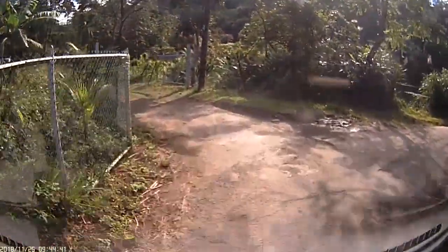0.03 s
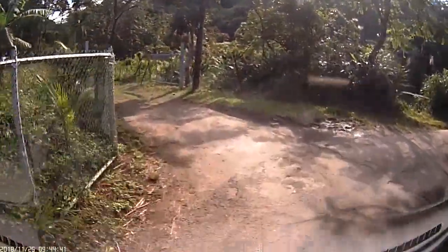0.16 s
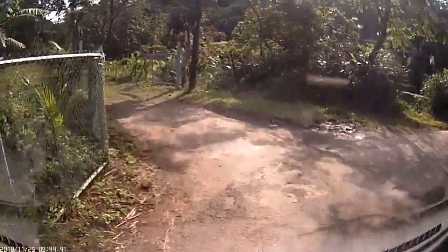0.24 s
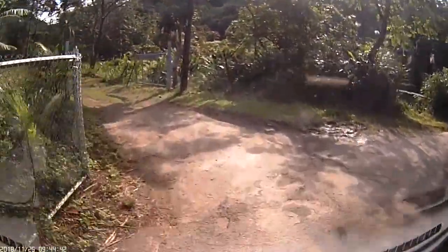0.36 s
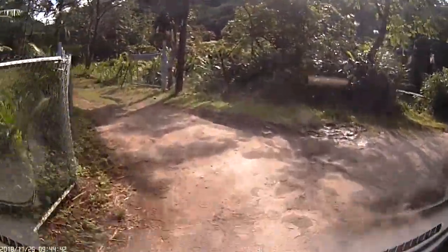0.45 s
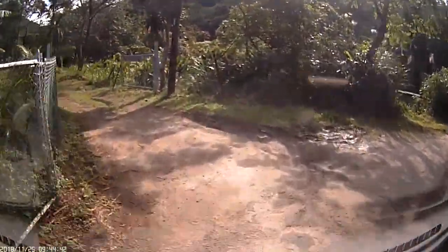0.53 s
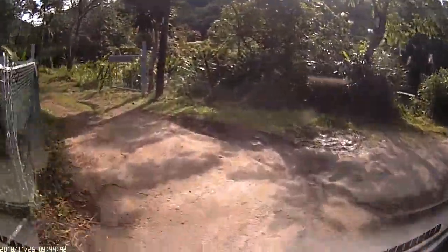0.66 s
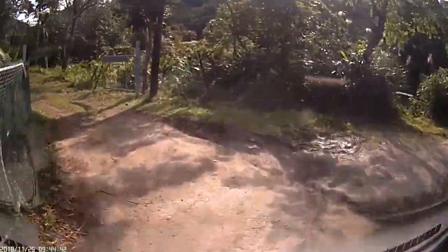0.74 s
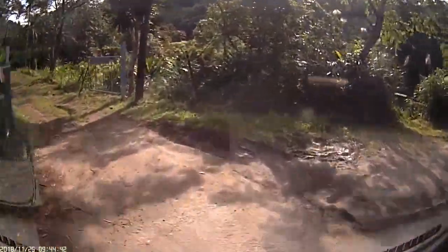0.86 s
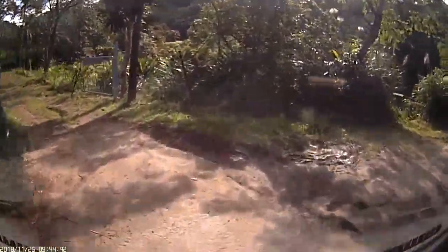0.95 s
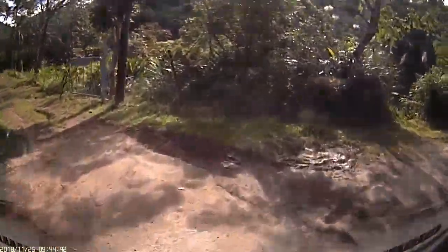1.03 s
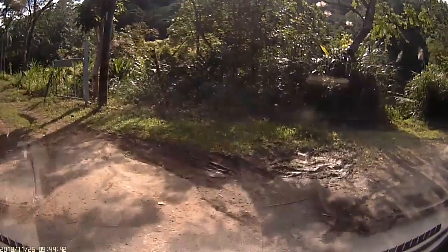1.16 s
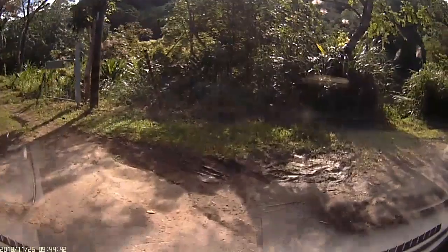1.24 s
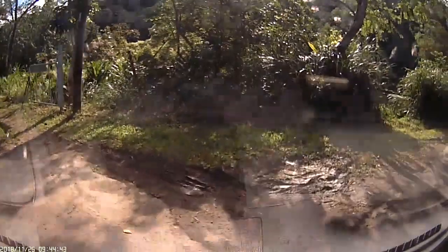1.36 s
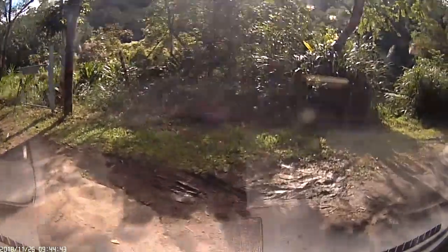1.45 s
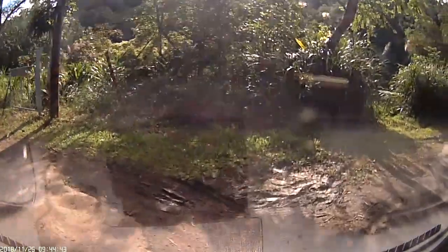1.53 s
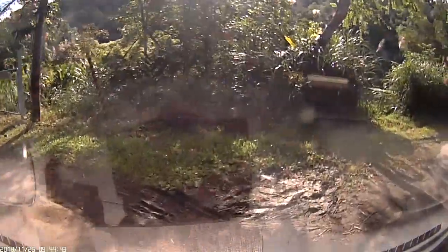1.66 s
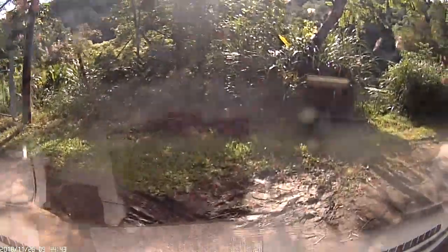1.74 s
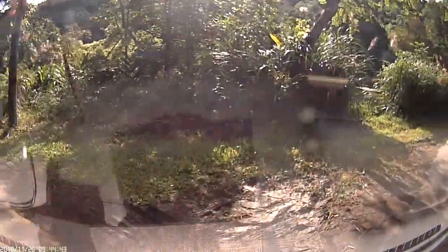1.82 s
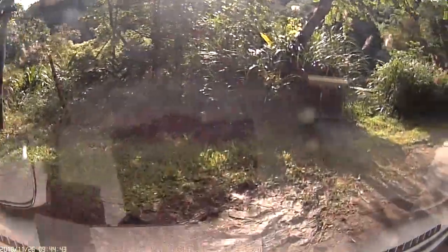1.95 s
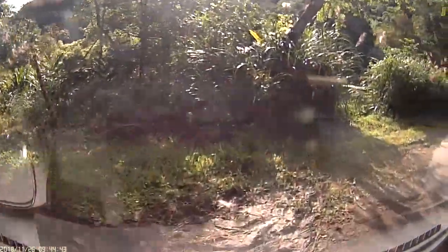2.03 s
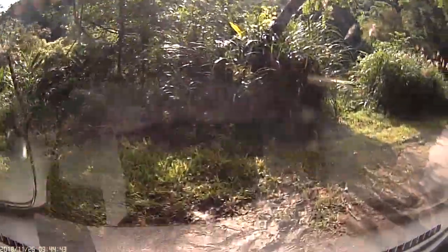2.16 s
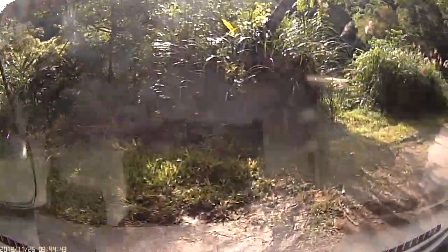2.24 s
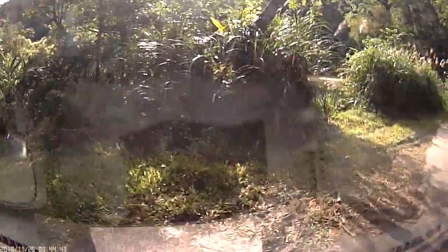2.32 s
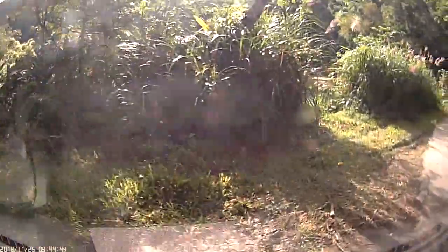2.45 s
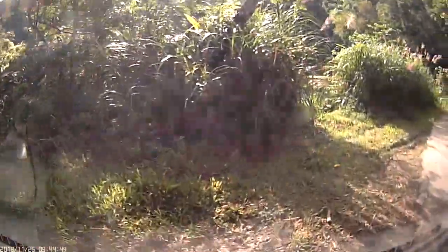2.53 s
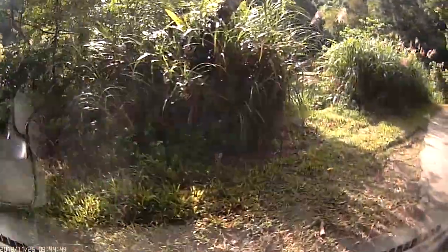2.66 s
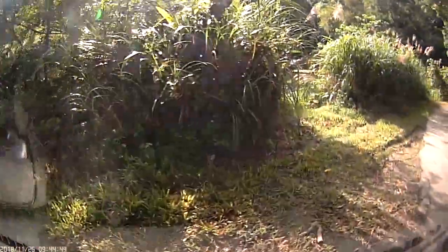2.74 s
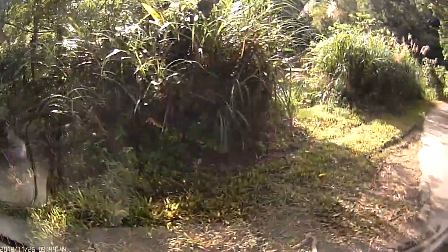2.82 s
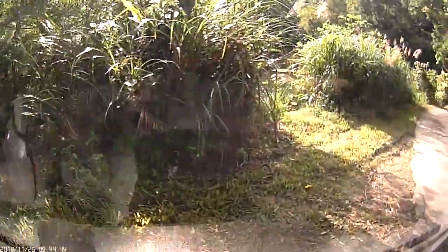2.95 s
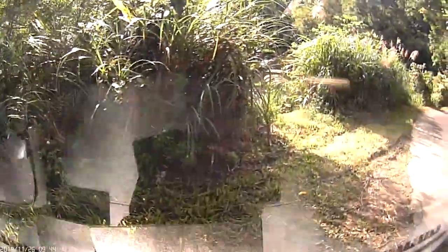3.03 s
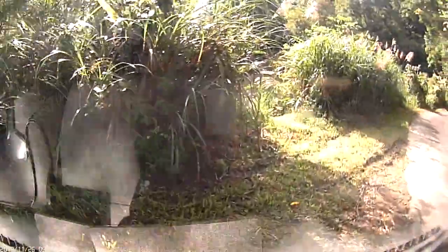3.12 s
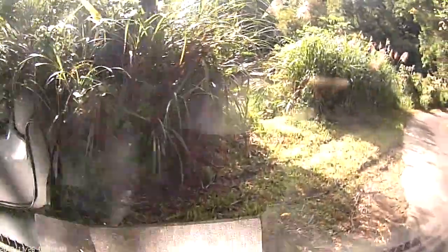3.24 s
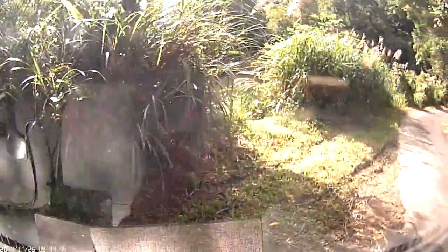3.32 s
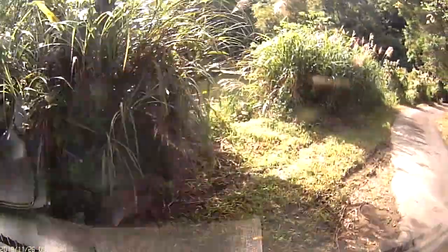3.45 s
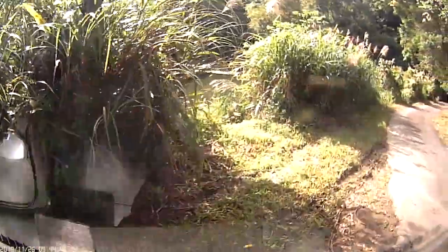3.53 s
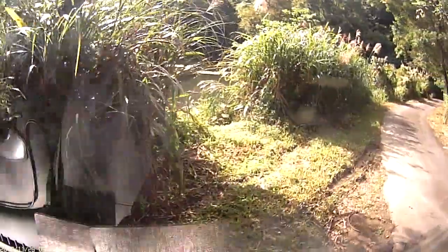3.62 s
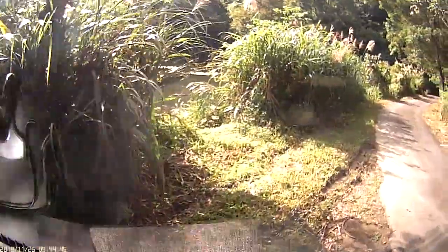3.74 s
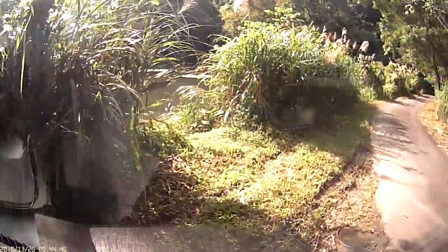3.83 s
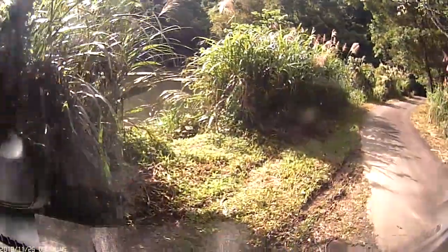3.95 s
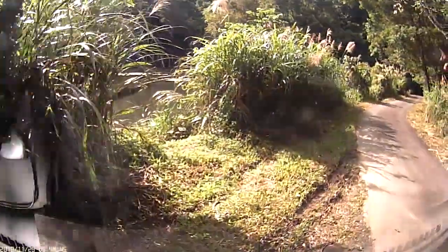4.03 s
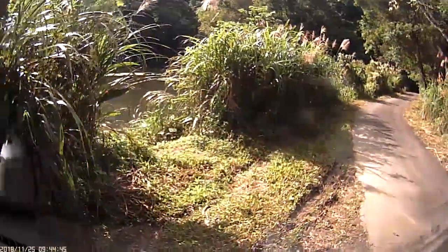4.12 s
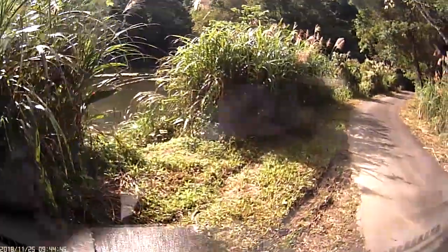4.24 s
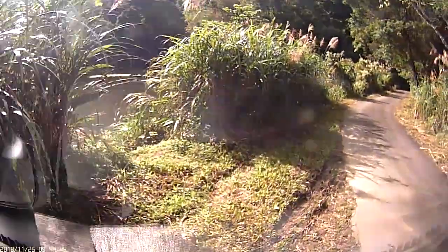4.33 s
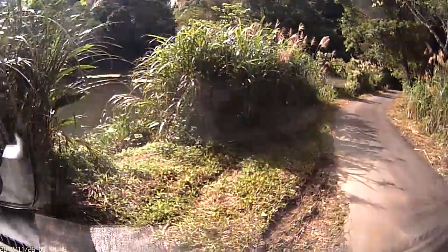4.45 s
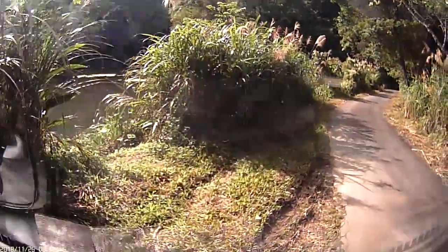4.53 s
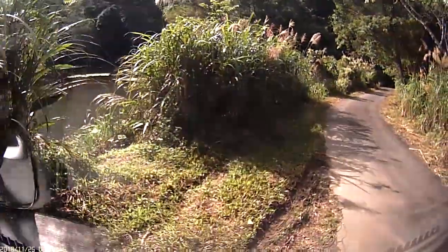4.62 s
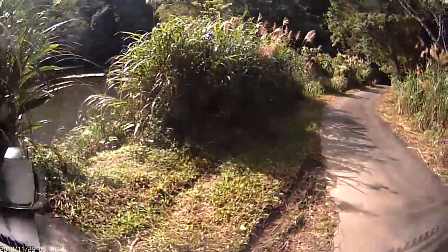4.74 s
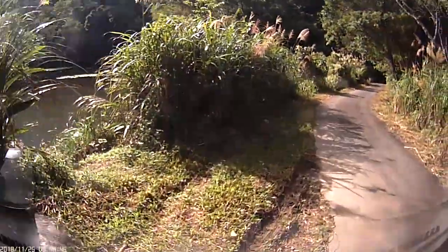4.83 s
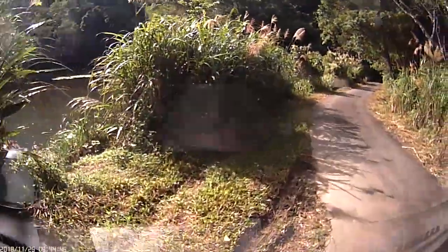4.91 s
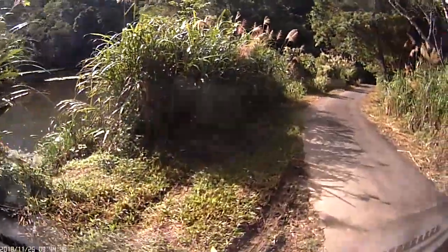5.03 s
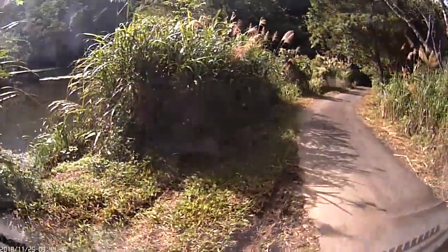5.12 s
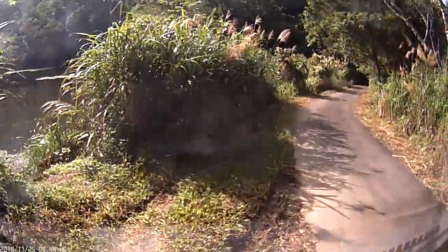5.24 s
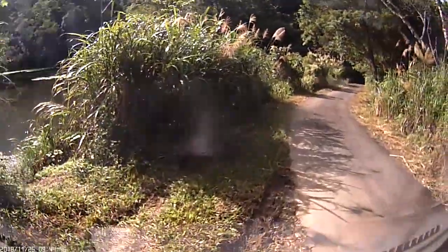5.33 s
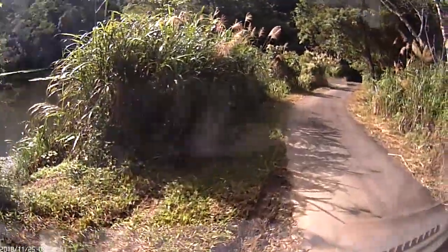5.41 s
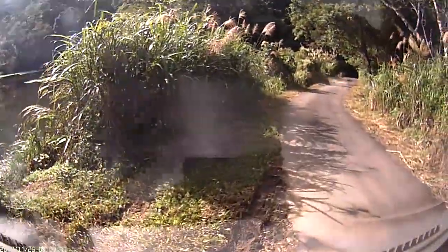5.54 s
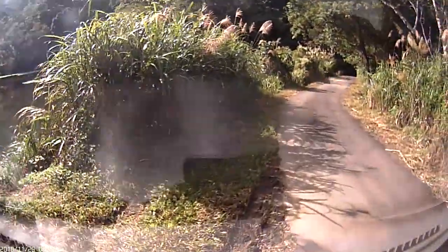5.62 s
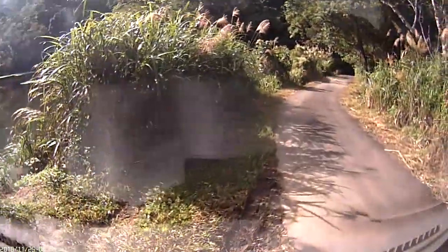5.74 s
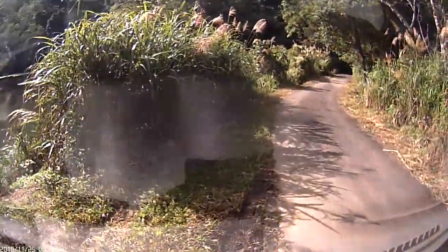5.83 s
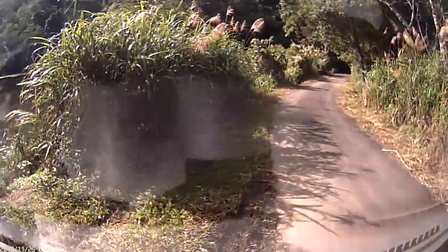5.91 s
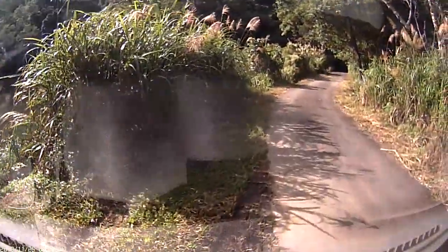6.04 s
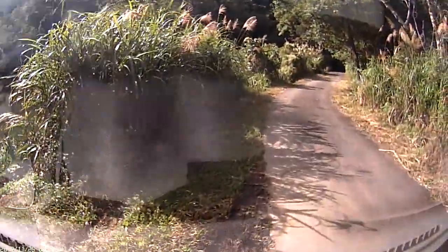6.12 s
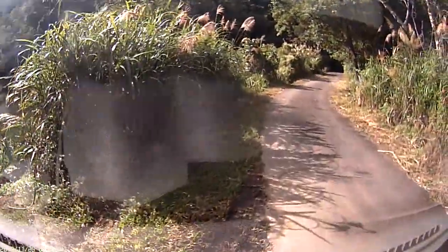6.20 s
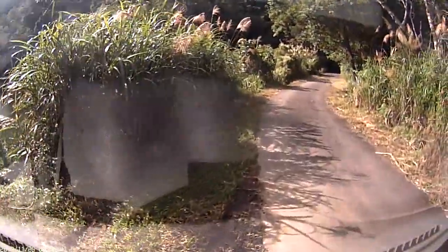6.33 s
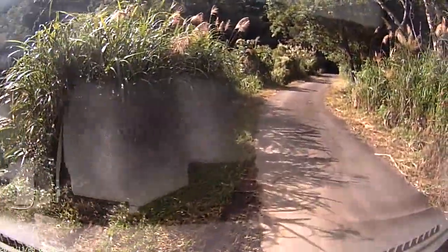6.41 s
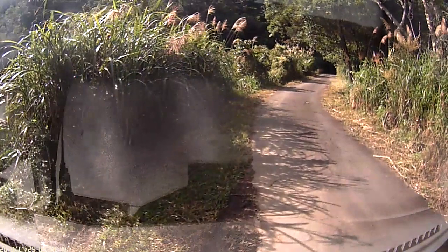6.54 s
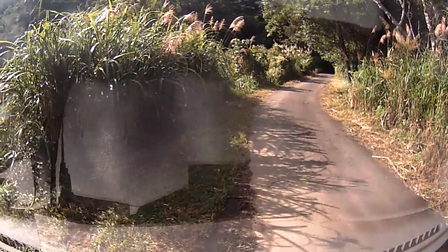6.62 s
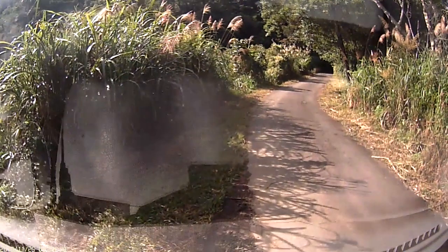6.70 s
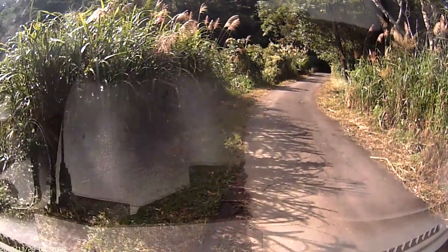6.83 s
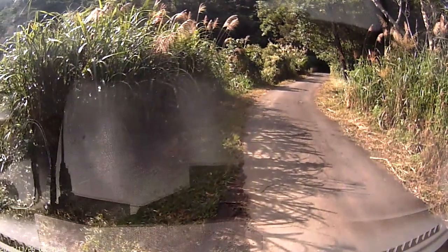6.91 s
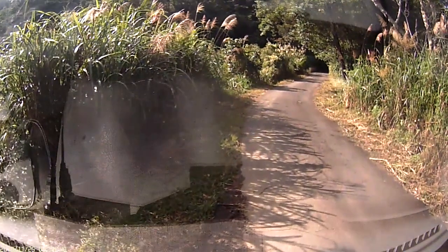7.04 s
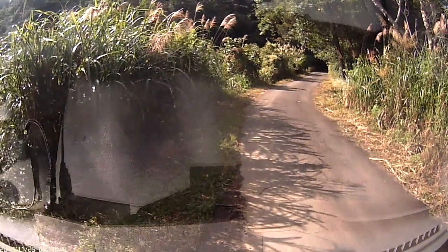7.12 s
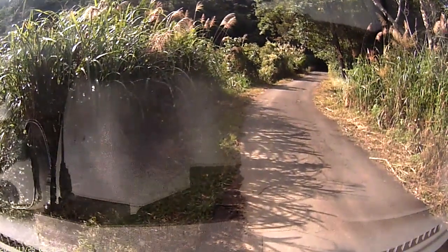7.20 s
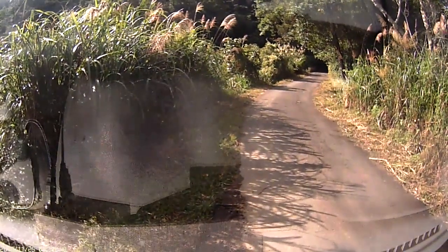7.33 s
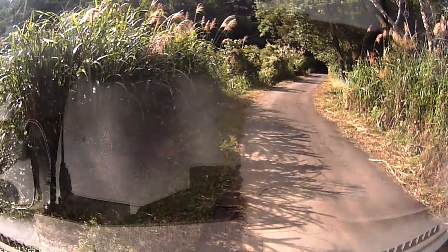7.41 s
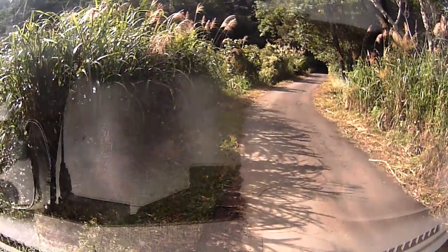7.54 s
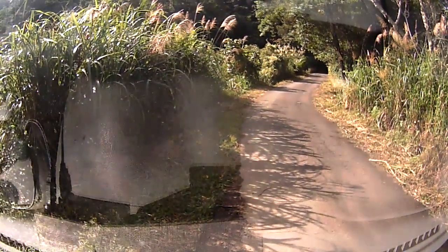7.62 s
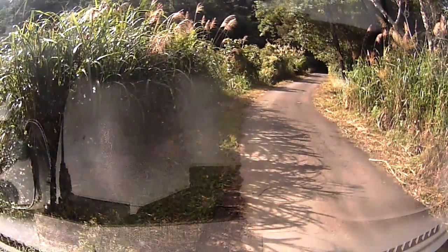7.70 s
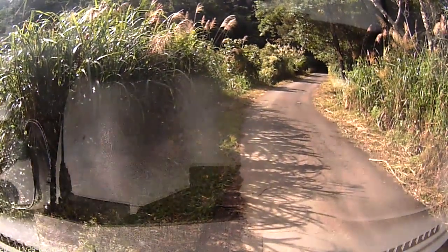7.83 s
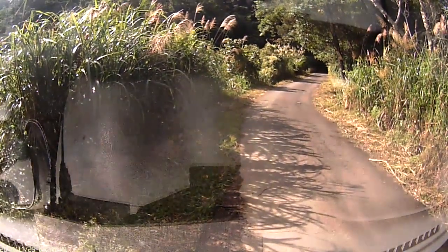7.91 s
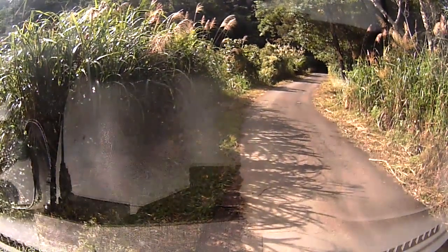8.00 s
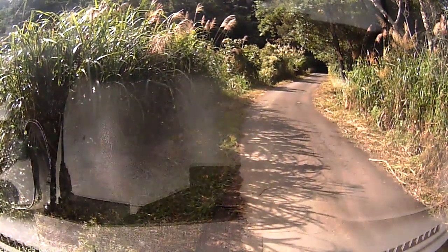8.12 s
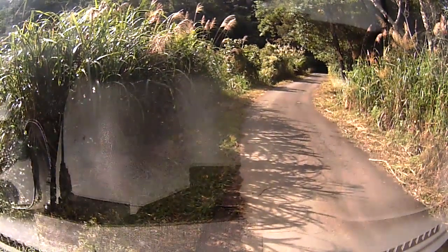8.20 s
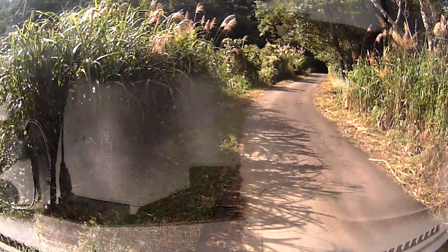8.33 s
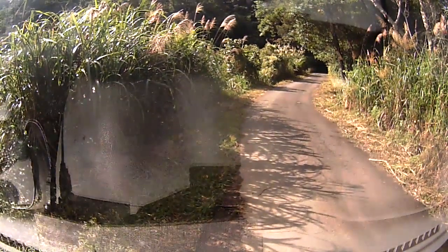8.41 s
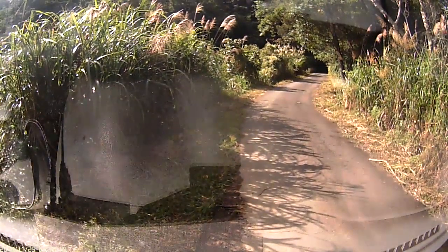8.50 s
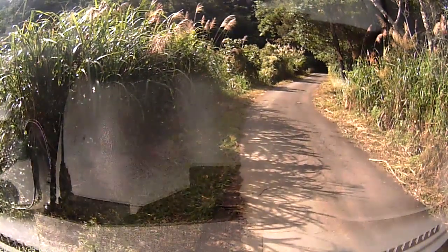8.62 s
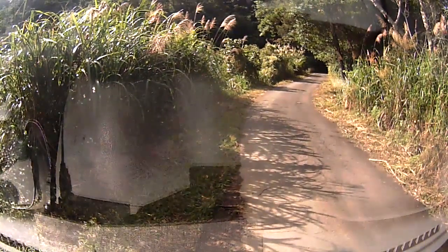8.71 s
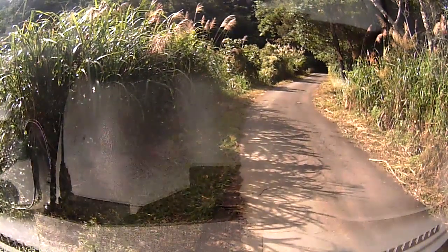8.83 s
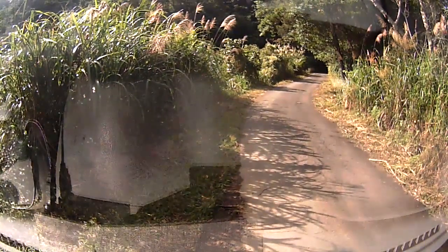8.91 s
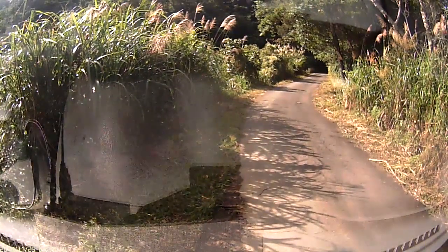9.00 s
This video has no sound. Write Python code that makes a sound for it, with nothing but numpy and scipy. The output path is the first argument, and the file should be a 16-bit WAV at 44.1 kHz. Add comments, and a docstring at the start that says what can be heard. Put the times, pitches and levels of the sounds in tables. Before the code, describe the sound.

A car interior, close and boomy. The engine drones very low while the body sways and bumps, overloading the microphone into rough crackles. Loose panels tap rapidly at first, stones scrub under the tyres, and fittings knock and tick. The ride becomes calmer after about six seconds; a quick metallic handbrake ratchet and dull thud follow, then low uneven idling over a faint fan-like rush.

```python
"""Inside a car that crawls over a broken lane and stops: the body booms, tyres grumble, trim chatters, keys jingle.
The handbrake is pulled up its ratchet and the engine idles on.
Contacts are shaped noise and struck modes; the boom is swaying noise with a forced swing at each bump.
The boom overloads a dashboard camera, whose stepping limiter crackles and ducks everything else."""
import sys
import numpy as np
from scipy import signal
from scipy.fft import rfft, irfft, next_fast_len
from scipy.io import wavfile
from scipy.ndimage import uniform_filter1d, minimum_filter1d

SR = 44100
rng = np.random.default_rng(int(sys.argv[2]) if len(sys.argv) > 2 else 0)


def generate_wav(signal):
    """Clip the signal to [-1, 1] and save it as 16-bit WAV at the path in sys.argv[1]."""
    frames = np.transpose(np.atleast_2d(signal))
    scaled = np.clip(frames, -1, 1) * 32767
    pcm = np.round(scaled).astype(np.int16)
    wavfile.write(sys.argv[1], SR, pcm)


N = 399546
TIME = np.arange(N) / SR
# spectrum of a contact tick: [f/Hz, relative level/dB per Hz]
TICK_SPECTRUM = [(1200, -46), (3300, -0.5), (4300, -0.5), (5300, 4), (7200, 4), (9000, -6), (12000, -24),
                 (16000, -37)]


def undb(db):
    """Decibels to amplitude gain."""
    return 10 ** (np.asarray(db) / 20)


def curves(table):
    """Columns after the first, joined by straight lines over the times in the first."""
    s, *columns = np.transpose(table)
    return [np.interp(TIME, s, c) for c in columns]


def colour(x, spectrum):
    """Filter by a spectrum, linear in dB over log frequency; rms 1."""
    hz, db = np.transpose(spectrum)
    size = next_fast_len(len(x))
    f_hz = np.maximum(np.arange(size // 2 + 1) * SR / size, 1)
    gain = undb(np.interp(np.log(f_hz), np.log(hz), db))
    y = irfft(rfft(x, size) * gain, size)[:len(x)]
    return y / y.std()


def noise(spectrum):
    """Coloured Gaussian noise, rms 1."""
    return colour(rng.standard_normal(N), spectrum)


def walk(rate_hz):
    """Random levels held 1 / rate_hz and slewed twice; spread near 1."""
    hold = max(int(SR / rate_hz), 1)
    steps = np.repeat(rng.standard_normal(N // hold + 1), hold)
    slewed = uniform_filter1d(uniform_filter1d(steps, hold), hold)
    return 1.4 * slewed[:N]


def fades(times_s, dbs, t60s):
    """Level of a dense ring struck at the given times; the blows add in power."""
    power, t = np.zeros(N), TIME[:SR // 2]
    for s, db, t60_s in np.broadcast(times_s, dbs, t60s):
        i = max(int(s * SR), 0)
        decay = np.exp(-2 * np.log(1000) * t / t60_s)
        power[i:i + len(t)] += (undb(db) ** 2 * decay)[:N - i]
    return np.sqrt(power)


def ring(blows, modes):
    """Each blow sets the modes ringing; uneven contact gives them new phases and sizes."""
    out, t = np.zeros(N), TIME[:SR // 3]
    hz, mode_db, t60_s = np.transpose(modes)[:, :, None]
    tones = undb(mode_db) * np.exp((2j * np.pi * hz - np.log(1000) / t60_s) * t)
    for s, db in blows:
        i = int(s * SR)
        phases = np.exp(2j * np.pi * rng.random(len(modes)))
        contact = phases * undb(db + rng.standard_normal(len(modes)))
        out[i:i + len(t)] += (contact @ tones).imag[:N - i]
    return out


def grains(rate_hz, spread_db, t60_s):
    """Level of many small random contacts that each decay, rms 1."""
    chance = rng.random((2, N))
    power = (chance[0] < rate_hz / SR) * undb(2 * spread_db * chance[1])
    power = signal.lfilter([1], [1, -np.exp(-2 * np.log(1000) / (t60_s * SR))], power)
    return np.sqrt(power / power.mean())


def rush():
    """Steady broadband rush of fan and engine bay, wavering slightly."""
    # [f/Hz, relative level/dB per Hz]
    cabin_spectrum = [(140, -45), (230, -8.5), (310, 1), (409, -19.5), (455, -11.5), (931, -25),
                      (1020, -16.5), (1190, -17.5), (1390, -13.5), (1910, -21), (3000, -29), (3840, -28),
                      (4900, -27.5), (6150, -28.5), (15000, -33.5)]
    return noise(cabin_spectrum) * undb(-50 + .5 * walk(6.4))


def squeak(at_s=7.242, hz=2250, db=-52, width_s=0.027, rise_hz_per_s=3500):
    """A tiny squeak just before the lever moves: a rising, jittery tone in a Gaussian swell."""
    glide_hz = hz + rise_hz_per_s * (TIME - at_s)
    phase = 2 * np.pi * np.cumsum(glide_hz * (1 + 0.0096 * walk(149.7))) / SR
    return undb(db) * np.exp(-((TIME - at_s) / width_s) ** 2) * np.sin(phase)


def keys():
    """Hanging keys touch with a tick and a thin modal ring."""
    # touches: [t/s, level/dB]
    touches = [(4.672, -42), (5.262, -32), (5.301, -36), (5.465, -42.5), (5.733, -37), (7.949, -40)]
    # [f/Hz, relative level/dB, t60/s]
    key_modes = [(3360, -9.5, 0.098), (6379, -30, .16), (7740, -41, .07), (8400, -16, 0.28),
                 (9200, -0.5, 0.12), (10900, -21, .1), (15200, -23, .1)]
    s, db = np.transpose(touches)
    return ring(touches, key_modes) + noise(TICK_SPECTRUM) * fades(s, db, t60s=0.079)


def clatter():
    """Dashboard panels buzz against their clips after a jolt: grainy noise that decays."""
    # jolts: [t/s, level/dB, t60/s]
    jolts = [(1.265, -30, 0.22), (4.002, -33.5, 0.12), (4.418, -40, 0.12), (5.796, -40.5, 0.13),
             (5.845, -44, 0.068), (5.885, -38, 0.099), (5.94, -48, 0.072), (6.246, -29.5, 0.18),
             (6.26, -36, .1), (7.348, -33.5, .14), (7.694, -42.5, .1), (7.835, -38.5, 0.16),
             (8.175, -39.5, .16), (8.194, -40, 0.12)]
    # [f/Hz, relative level/dB per Hz]
    buzz_spectrum = [(400, 1), (1000, -18), (1300, -0.5), (1700, 3.5), (2100, -18.5), (3200, -12.5),
                     (4200, -26), (7500, -25), (12000, -47)]
    s, db, t60_s = np.transpose(jolts)
    contacts = grains(rate_hz=800, spread_db=4, t60_s=.02)
    return noise(buzz_spectrum) * contacts * fades(s, db, t60_s)


def scuffs(gain_db=3.5):
    """Stones and grass scrub under a tyre, swelling and fading as it crosses each patch."""
    # rough patches: [t of middle/s, level before gain_db/dB, Gaussian half length/s]
    patches = [(1.65, -43, 0.075), (2.12, -36, .03), (2.78, -42.5, 0.12), (3.194, -37, 0.063),
               (3.95, -41.5, 0.047), (4.047, -41.5, 0.026), (4.142, -43.5, .03), (4.35, -43.5, 0.079),
               (4.437, -35.5, 0.035), (4.537, -40, 0.041), (4.84, -44, 0.15), (5.578, -41.5, 0.072),
               (5.8, -47, 0.069), (6.19, -41.5, 0.045), (6.64, -39.5, .02), (7.828, -39.5, 0.027)]
    # [f/Hz, relative level/dB per Hz]
    scrub_spectrum = [(150, 6), (330, 11), (550, 5), (900, 0.5), (1500, -5.5), (2300, -22), (4000, -27),
                      (7500, -26), (12000, -43)]
    swell = sum(undb(db + gain_db) * np.exp(-((TIME - s) / half_s) ** 2) for s, db, half_s in patches)
    stones = grains(rate_hz=200, spread_db=9, t60_s=.04)
    return noise(scrub_spectrum) * stones * swell


def taps(gap_s=0.025, jitter_s=0.0013, fade_db=22, scatter_db=2):
    """A loose panel bounces near-evenly, harder towards the middle of each burst: rows (s, dB)."""
    # bursts: [t of middle/s, mean level there/dB, reach before and after/s]
    bursts = [(0.034, -31.5, .02), (.38, -40, .01), (.585, -37, .01), (.616, -33.5, .01), (.651, -27, .01),
              (.722, -33.5, .06), (0.822, -36, .05), (.975, -42.5, .01), (1.089, -26.5, .11),
              (1.335, -37, .02), (1.529, -37, .02), (2.18, -39, .02), (2.71, -37.5, .05), (7.68, -44, .03)]
    rows = []
    for s, db, reach_s in bursts:
        each_side = int(reach_s / gap_s)
        for offset_s in gap_s * np.arange(-each_side, each_side + 1):
            late, harder = rng.standard_normal(2)
            tap_s = max(s + offset_s + jitter_s * late, 0)
            tap_db = db - fade_db * abs(offset_s) / reach_s + scatter_db * harder
            rows.append((tap_s, tap_db))
    return rows


def trim(ring_db=-4, fret_db=-7.5, tap_db=-3.0):
    """Plastic panels fret against each other; now and then one taps and rings briefly."""
    # [f/Hz, relative level/dB per Hz]
    plastic_spectrum = [(800, 5), (1600, -3.5), (2600, 2.5), (3500, 2), (3900, 3), (4400, -2.5), (5500, -2),
                        (7000, 6), (8500, -0.5), (10500, -12.5), (15000, -46)]
    # loose panel: [f/Hz, relative level/dB, t60/s]
    panel_modes = [(3900, -3, 0.034), (3940, -5, 0.029), (6640, -13, 0.046), (6900, -5, 0.047),
                   (7300, -17, 0.066)]
    # fretting: [t/s, level before fret_db/dB]
    rustle = [(0, -41), (0.3, -48.5), (0.7, -45), (0.95, -42), (1.12, -37), (1.4, -51.5), (1.6, -41),
              (2.5, -54), (3.3, -44.5), (4.3, -50), (4.8, -48.5), (5.9, -50.5), (6.7, -54.5), (7.7, -48.5),
              (8.5, -58)]
    fret = grains(rate_hz=120, spread_db=7, t60_s=0.083) * undb(curves(rustle)[0] + fret_db)
    blows = taps()
    s, db = np.transpose(blows)
    rasp = noise(plastic_spectrum) * np.hypot(fret, fades(s, db + tap_db, t60s=0.037))
    return rasp + undb(ring_db) * ring(blows, panel_modes)


def knocks(tick_share=0.56):
    """A fitting or hanging key ticks at the contact, clacks in the panels and rings briefly."""
    # [t/s, clack level/dB, tick level/dB, ring level/dB, clack t60/s]
    hits = [(1.235, -19.5, -23.5, -15.5, 0.15), (1.267, -30, -35.5, -40, 0.25),
            (3.997, -38.5, -45, -41, 0.18), (5.252, -20, -33, -28, .06), (5.259, -20.5, -32, -21, 0.1),
            (5.886, -47, -54, -41, 0.045), (6.153, -48, -45, -50, .06), (6.164, -40.5, -41, -57, 0.1),
            (6.19, -44, -39, -57, 0.068), (6.246, -35, -51, -39, 0.13), (6.452, -46, -46.5, -56, 0.22),
            (6.626, -40.5, -67, -52, .16), (7.323, -30, -30.5, -36, 0.22), (7.377, -24, -37, -38, .08),
            (7.509, -29, -31, -50, 0.13), (7.807, -41.5, -61, -49, 0.4), (8.015, -58, -50, -56, 0.1),
            (8.153, -36, -54, -51, 0.095), (8.174, -44, -48, -52, 0.44)]
    # [f/Hz, relative level/dB, t60/s]
    knock_modes = [(542, -22, 0.12), (820, -6, 0.052), (1643, -3, 0.036), (2140, -3.5, 0.031)]
    # [f/Hz, relative level/dB per Hz]
    clack_spectrum = [(150, -2), (550, 10), (900, 6), (1500, 3.5), (2100, -4), (2800, -9.5), (5000, -21),
                      (12000, -62)]
    s, clack_db, tick_db, ring_db, t60_s = np.transpose(hits)
    clacks = noise(clack_spectrum) * fades(s, clack_db, t60_s)
    ticks = noise(TICK_SPECTRUM) * fades(s, tick_db, tick_share * t60_s)
    return ring(zip(s, ring_db), knock_modes) + clacks + ticks


def handbrake(noise_db=-6.5, ring_db=-6, ring_fade_db=-5, snap_db=0, snap_t60_s=0.0045,
              tail_db=-10, tail_t60_s=0.098, count=12):
    """A pawl snaps over even teeth, slowing and rising as the cable tightens; the stiffening lever rings less."""
    # [f/Hz, relative level/dB per Hz]
    ratchet_spectrum = [(60, 14), (130, 7), (400, 10.5), (650, 9), (900, -0.5), (1500, 8.5), (2400, -0.5),
                        (3500, 3.5), (5000, -3), (7200, 7.5), (8800, -4), (12000, -18), (16000, -42)]
    # lever and bracket: [f/Hz, relative level/dB, t60/s]
    lever_modes = [(366, -7, .1), (450, -8, .06), (524, -7.5, .13), (607, -7, .13), (1168, -11, .09),
                   (1233, -11, .09), (1358, -7, .08), (1421, -5, .08), (1472, -1, .09), (1595, -6, .07),
                   (1920, -8, .07), (3540, -11, .07), (3980, -10, .07), (6877, -10, .08), (7310, -10, .08),
                   (7711, -14, .08)]
    pull_at_s, pull_s, slowing = 7.382, .084, 1.7
    tooth_db, tooth_fade_db, rasp_t60_s = -7.5, 0, .032
    pawl_start_hz, pawl_end_hz, pawl_t60_s, pawl_db = 3210, 4090, 0.044, -12
    travel = np.linspace(0, 1, count)
    s = pull_at_s + pull_s * (1 - (1 - travel) ** (1 / slowing))
    db = tooth_db + tooth_fade_db * travel ** 2
    rasp = np.hypot(fades(s, db + noise_db, rasp_t60_s), fades(s, db + tail_db, tail_t60_s))
    rasp = np.hypot(rasp, fades(s, db + snap_db, snap_t60_s))
    pawl_hz = pawl_start_hz + (pawl_end_hz - pawl_start_hz) * np.sin(np.pi / 2 * travel) ** 2
    pawl = sum(ring([tooth], [(hz, pawl_db, pawl_t60_s)]) for tooth, hz in zip(zip(s, db), pawl_hz))
    lever = ring(zip(s, db + ring_db + ring_fade_db * travel ** 2), lever_modes)
    return noise(ratchet_spectrum) * rasp + pawl + lever


def tyres(grumble_db=-0.5, lumps_db=3.0, grit_full_load_db=-20, grit_db_per_db=0.84, patches_db=3.23):
    """Tread rolls over lumps and patches of grit, muffled by the floor; both follow the load."""
    # work of the tyres, rolling then settling on the brake: [t/s, load/dB]
    tyre_load = [(0, -30), (0.3, -30), (0.7, -30.5), (1.0, -31.5), (1.25, -24.5), (1.6, -32), (2.1, -34),
                 (2.45, -37), (2.75, -29.5), (3.0, -31.5), (3.25, -28.5), (3.85, -33), (4.45, -33),
                 (5.1, -37), (5.6, -37), (6.9, -41), (7.55, -30.5), (8.4, -43)]
    # both: [f/Hz, relative level/dB per Hz]
    grumble_spectrum = [(40, 9.5), (80, 3), (125, 7.5), (170, -1.5), (210, 6.5), (280, -11.5), (360, -5),
                        (480, -14), (650, -17), (1000, -49), (3000, -61)]
    crunch_spectrum = [(250, -9), (550, 11), (900, 5.5), (1150, 5), (1650, 2), (2300, -24), (3500, -7),
                       (8000, -73)]
    load_db, = curves(tyre_load)
    grumble = noise(grumble_spectrum) * undb(grumble_db + load_db + lumps_db * walk(25))
    grit_db = grit_full_load_db + grit_db_per_db * load_db + patches_db * walk(11)
    grit = grains(rate_hz=200, spread_db=8.5, t60_s=0.07) * undb(grit_db)
    return grumble + noise(crunch_spectrum) * grit


def thumps(shell_db=-5, shell_t60_s=0.2, mount_s=0.0035, thump_t60_s=0.15, overtone=1.85, overtone_db=-8):
    """A blow to the suspension or handbrake lever thuds at the struck part's pitch and stirs the body shell."""
    # [t/s, pitch of struck part/Hz, level/dB]
    blows = [(1.24, 128, -36), (1.67, 120, -17), (2.1, 216.4, -20), (2.521, 195, -27), (2.825, 367, -25.5),
             (3.665, 219, -22), (4.021, 343, -27.5), (4.421, 216, -19), (5.348, 150, -20.5),
             (5.512, 171, -27), (6.245, 379, -27), (6.255, 89.4, -9.5), (6.449, 99.7, -23.5),
             (6.631, 390, -37), (7.385, 259, -19), (7.508, 117, -14.5), (7.81, 217.6, -17)]
    # body shell: [f/Hz, relative level/dB per Hz]
    thud_spectrum = [(30, 15), (70, 15.5), (120, -12), (180, -2), (330, 6), (500, -7.5), (900, -32),
                     (3000, -78)]
    s, _, thud_db = np.transpose(blows)
    out = noise(thud_spectrum) * uniform_filter1d(fades(s, thud_db + shell_db, shell_t60_s), size=200)
    t = TIME[:SR // 2]
    # rubber mounts soften the push
    swell = (1 - np.exp(-t / mount_s)) * np.exp(-np.log(1000) * t / thump_t60_s)
    for start_s, hz, db in blows:
        i = int(start_s * SR)
        upper = undb(overtone_db) * swell * np.sin(2 * np.pi * overtone * hz * t)  # swell twice: dies sooner
        tone = np.sin(2 * np.pi * hz * t) + upper
        out[i:i + len(t)] += (undb(db) * np.sqrt(2) * swell * tone)[:N - i]
    return out


def engine():
    """Four cylinders near idle: a deep, jittery firing tone with wavering overtones."""
    # [multiple of firing rate, mean level re firing tone/dB]; the first row is that tone
    orders = [(1, 0), (2, -17.5), (3, -60), (4, -50), (5, -54), (6, -32.5), (8, -34.5), (9, -41), (12, -63),
              (13, -45.5)]
    # [t/s, mean firing rate/Hz]
    firing = [(0, 31.5), (1.8, 33.29), (2.4, 26.94), (6.3, 25.13), (6.7, 26.8), (7.1, 25.76), (7.8, 26.78),
              (9.05, 25.67)]
    # [t/s, rms level of firing tone/dB]
    drone_level = [(0, -21.5), (1.8, -17.5), (6.4, -21.5), (6.55, -23.5), (6.68, -15), (7.08, -30),
                   (7.26, -13), (7.45, -24), (7.84, -26), (8.02, -18), (8.2, -32.5), (8.7, -18.5),
                   (9.05, -17)]
    (hz,), (db,) = curves(firing), curves(drone_level)
    phase = 2 * np.pi * np.cumsum(hz * (1 + 0.0136 * walk(14))) / SR
    out = np.sin(phase)
    for order, order_db in orders[1:]:
        overtone = np.sin(round(order) * phase + 2 * np.pi * rng.random())
        out = out + undb(order_db + 3.4 * walk(14.0)) * overtone
    return np.sqrt(2) * out * undb(db)


def body(drone, attack_s=0.0144, release_s=0.0143, uneven_db=1.65, damping_db_per_s=26):
    """Cabin pressure sways with the lane; each bump forces a full swing, which sags while the bump lasts."""
    # [f/Hz, relative level/dB per Hz]
    boom_spectrum = [(10, -11), (20, -4), (27, 3.5), (36, -5.5), (45, -5), (55, -19.5), (72, -35),
                     (110, -27.5), (170, -57), (400, -99)]
    # sway, dying down as the car stops: [t/s, level/dB]
    sway_level = [(0, -9.5), (0.85, -9), (1.1, -12.5), (1.9, -10.5), (2.3, -8), (2.6, -12.5), (3.0, -12),
                  (3.55, -9.5), (4.0, -17), (4.6, -12), (5.3, -15), (5.9, -24.5), (6.35, -14.5), (6.9, -35),
                  (7.6, -17), (8.4, -28.5), (9.05, -34)]
    # [t/s, mean peak pressure/dB, length/s, swing f/Hz]
    lane_bumps = [(0.058, 0, 0, 30.5), (0.163, 0.5, 0, 31.4), (0.266, 3.5, 0.0072, 26.5),
                  (0.354, -2, 0.0047, 41), (0.431, 2, 0.013, 29.1), (0.494, 3, 0.022, 26.6),
                  (0.745, -2, 0, 34), (0.787, 2, 0.012, 41.3), (0.883, 1, 0.017, 31.2),
                  (1.147, -1, 0.00069, 38.7), (1.193, 1, 0.0095, 39.4), (1.366, 1, 1, 32),
                  (1.42, 2, 0.000073, 28.5), (1.589, 0.5, 0.019, 30.5), (1.713, 0, 0.0017, 29.6),
                  (1.738, -3.5, 0, 24), (1.791, 1.5, 0.0036, 28.9), (1.892, 2.5, 0.004, 28),
                  (1.942, 0, 0.0019, 26.5), (2.104, 0, 0.023, 32.8), (2.211, 3, 0.004, 23.5),
                  (2.265, 3, 0, 24), (2.311, -1, 0, 24.3), (2.339, 0.5, 0.014, 22.35), (2.379, 0, 0, 24),
                  (2.58, 0.5, 0.0052, 27.6), (2.795, -3, 0.007, 26), (2.835, -3, 0.027, 26),
                  (2.856, 4.5, 0.0083, 22), (3.085, -0.5, 0.00034, 31.3), (3.127, -1, 0.0042, 32.3),
                  (3.191, -2, 0.022, 36), (3.225, -1.5, 0.0019, 25), (3.245, 3, 0.0069, 25.7),
                  (3.427, 1.5, 0, 21.8), (3.45, 5, 0.0112, 22.6), (3.691, 0, 0.033, 28.9),
                  (3.732, 1.5, 0.016, 29), (4.224, .5, 0.0018, 24), (4.47, -0.5, 0.01, 33.8),
                  (4.536, 1.5, 0.0035, 35.3), (4.682, -3.5, 0, 30), (4.771, -0.1, 0.0054, 29.8),
                  (4.844, 3, 0.0015, 28.3), (4.933, 0, 0.027, 27), (4.976, -1, 0.0026, 24.7),
                  (5.068, 0, 0.0067, 24), (5.232, -.5, 0.012, 24.7), (5.594, -2, 0.012, 42.5),
                  (5.657, 0.5, 0.0049, 37), (6.269, -2.5, 0.0039, 40), (6.282, -1.5, 0.0021, 38.02),
                  (6.308, -2, 0.0035, 26), (6.372, -5, 0.043, 25.5)]
    sway = signal.hilbert(noise(boom_spectrum))
    # the dampers even out large swings
    sway = sway.real / np.sqrt(uniform_filter1d(np.abs(sway) ** 2, size=1500) + 0.3)
    pressure = drone + sway / sway.std() * undb(curves(sway_level)[0])
    uneven = uneven_db * walk(40)
    for s, db, length_s, hz in lane_bumps:
        near = slice(max(int((s - .1) * SR), 0), int((s + .4) * SR))
        t = TIME[near] - s
        before, after = np.minimum(t, 0), np.maximum(t - length_s, 0)
        grip = np.exp(-(before / attack_s) ** 2 - (after / release_s) ** 2)
        peak_db = db + uneven[near] - damping_db_per_s * np.maximum(t, 0)
        peak = np.sign(pressure[int(s * SR)]) * undb(peak_db)  # keeps the sign of the pressure
        pressure[near] += (peak * np.cos(2 * np.pi * hz * t) - pressure[near]) * grip
    return pressure


def scene():
    """Sum of everything that reaches the dashboard."""
    small_parts = squeak() + keys() + clatter() + trim() + knocks() + handbrake()
    ride = scuffs() + tyres() + thumps() + body(engine())
    return (rush() + small_parts + ride)[None]


def limiter(x, ceiling_db=-3.5, dive_db_per_db=1.554, release_db_per_s=43, crest_db=1.4, hunts_per_s=1400,
            slip_db=0.24, slips_per_s=45, block=25, gain_step_db=1.55, step_relax_s=.0004, full_scale=.72):
    """Gain dives under each overload, jumps about at the crest, then creeps back with stray steps."""
    blocks = np.pad(x, (0, -N % block)).reshape(-1, block)
    level_db = 20 * np.log10(np.abs(blocks).mean(axis=1) + 1e-9)
    over_db = np.repeat(np.maximum(level_db - ceiling_db, 0), block)[:N]
    recovery_db = release_db_per_s * TIME
    cut_db = np.maximum.accumulate(dive_db_per_db * over_db + recovery_db) - recovery_db
    crest = -minimum_filter1d(-over_db, size=675)  # running maximum
    at_crest = (over_db > 0) & (over_db > crest - crest_db)
    chance, jump = rng.random(N) * SR, rng.standard_normal(N)
    width = np.tanh(0.11 + over_db / 4)  # wider when driven harder
    hunts = gain_step_db * (at_crest & (chance < hunts_per_s)) * width * np.sign(jump)
    slips = slip_db * ((cut_db > 1) & (chance < slips_per_s)) * jump
    # each step starts to relax at once
    steps_db = signal.lfilter([1], [1, -np.exp(-1 / (step_relax_s * SR))], hunts + slips)
    gain = undb(-uniform_filter1d(cut_db, size=350) - steps_db)
    return np.clip(x * gain, -full_scale, full_scale)


def record(dry, top_hz=15600):
    """The camera limits the level, then cuts the top with a steep low-pass."""
    low_pass = signal.ellip(10, .2, 80, top_hz, fs=SR, output="sos")
    return signal.sosfilt(low_pass, limiter(dry[0]))[None]


dry = scene()
out = record(dry)
generate_wav(out)
```